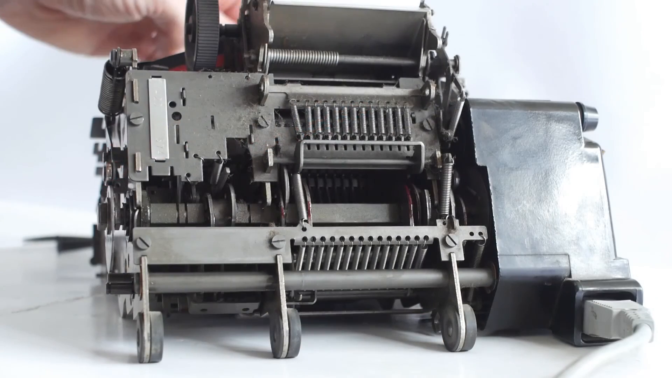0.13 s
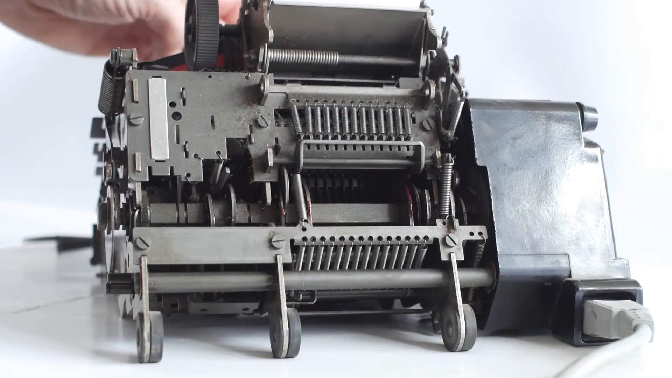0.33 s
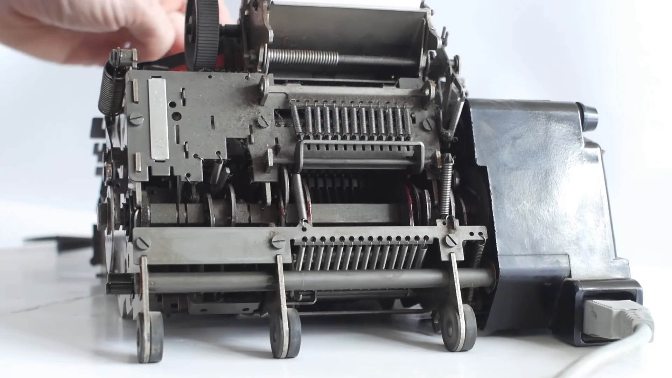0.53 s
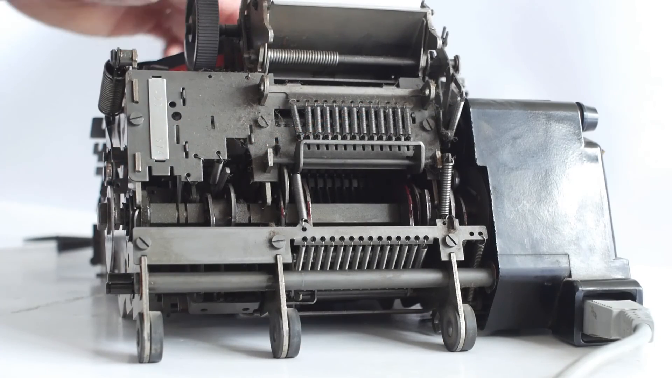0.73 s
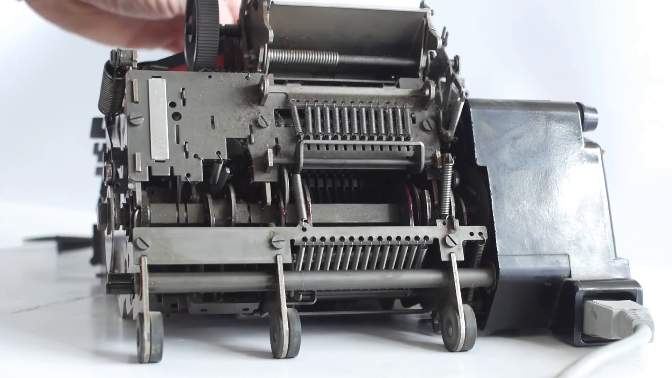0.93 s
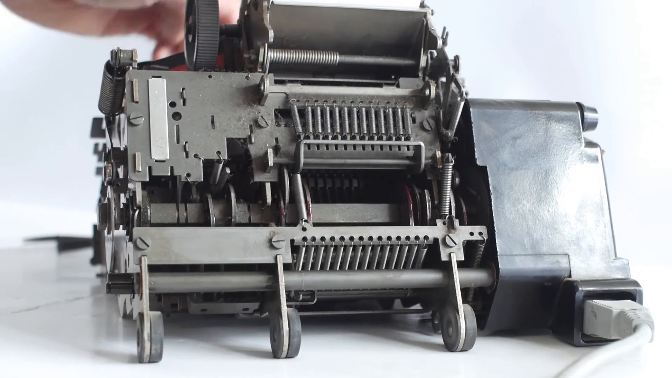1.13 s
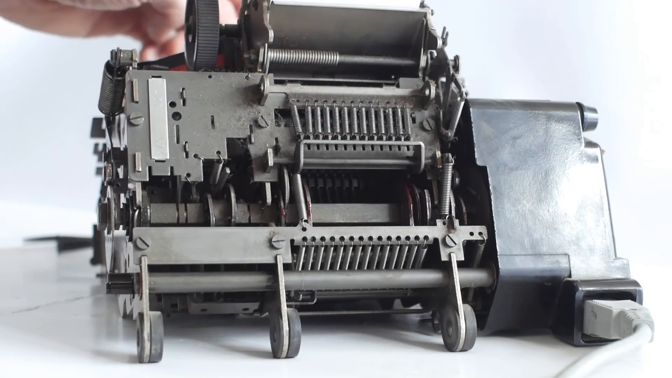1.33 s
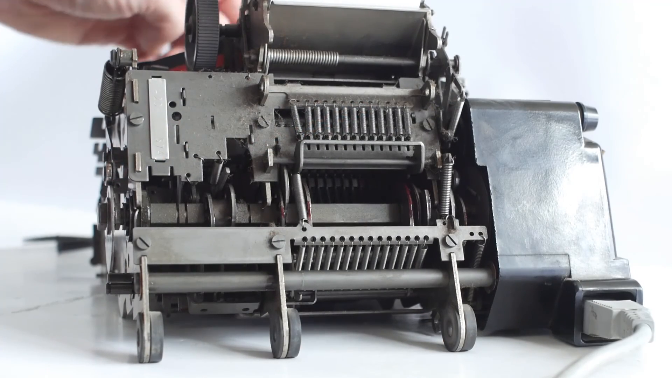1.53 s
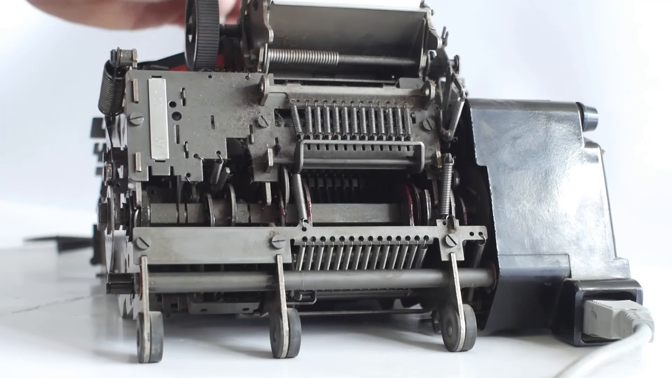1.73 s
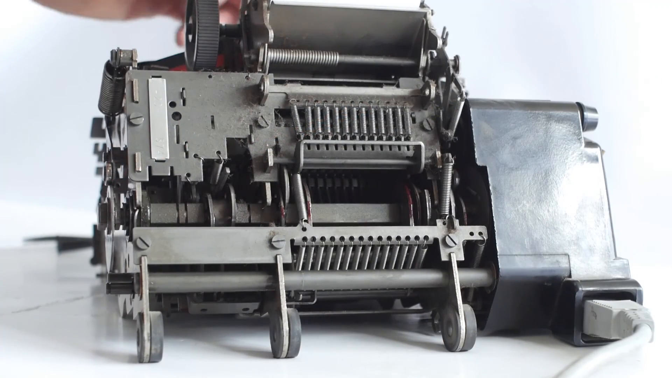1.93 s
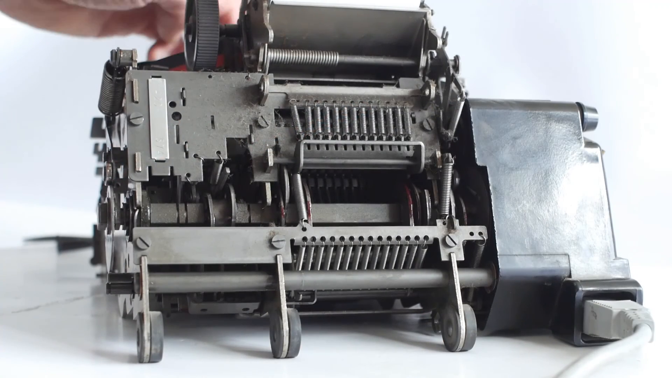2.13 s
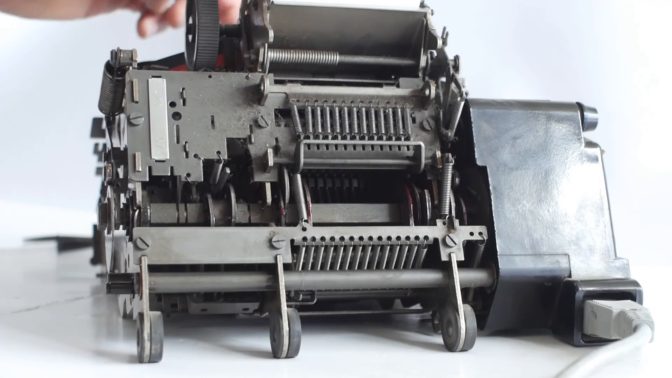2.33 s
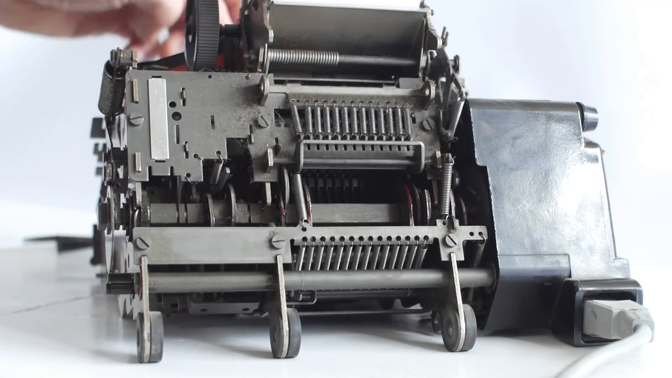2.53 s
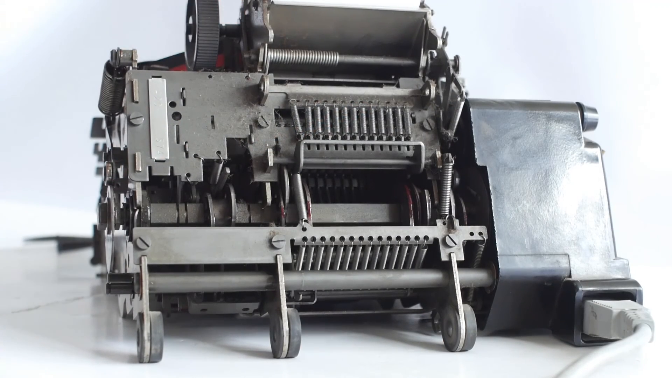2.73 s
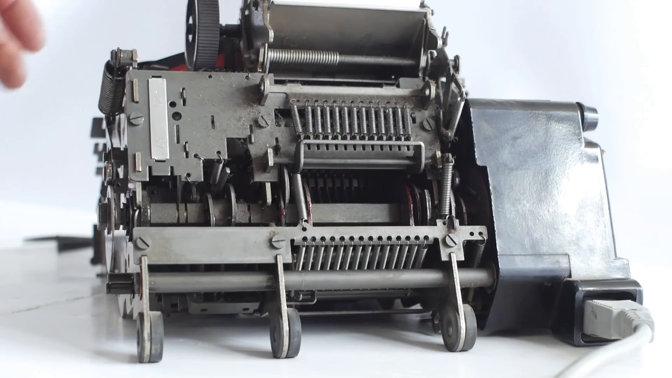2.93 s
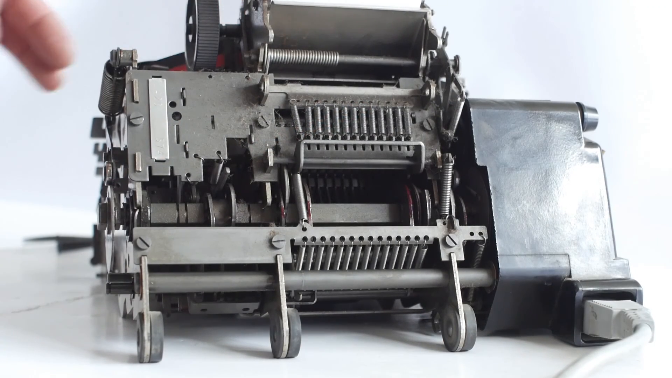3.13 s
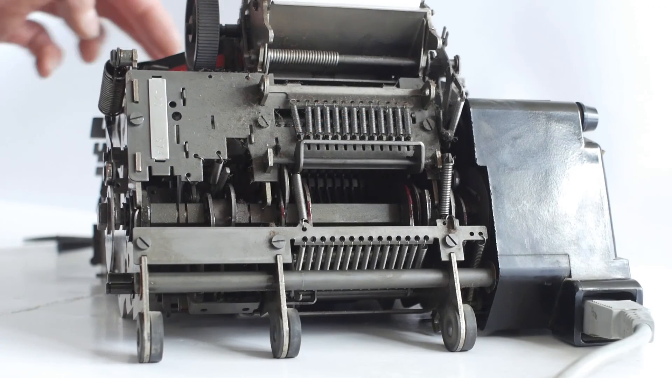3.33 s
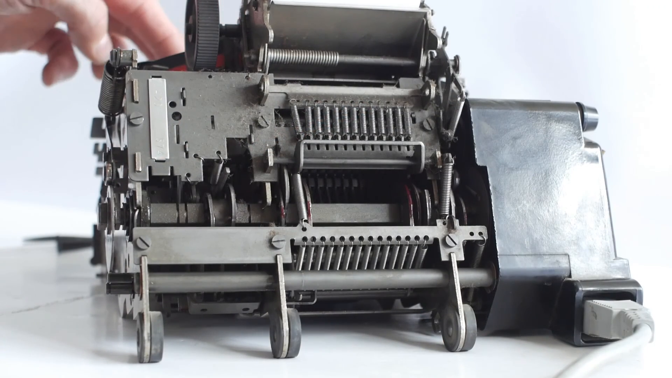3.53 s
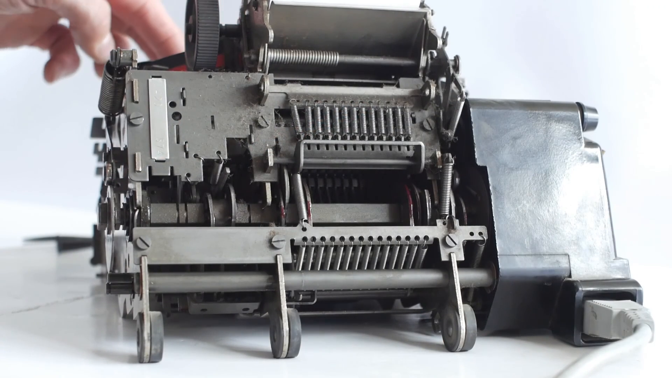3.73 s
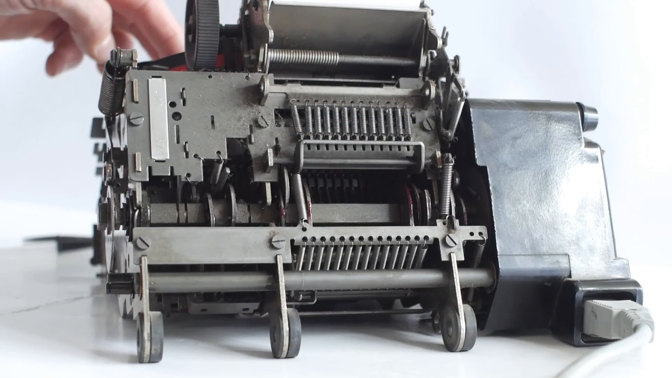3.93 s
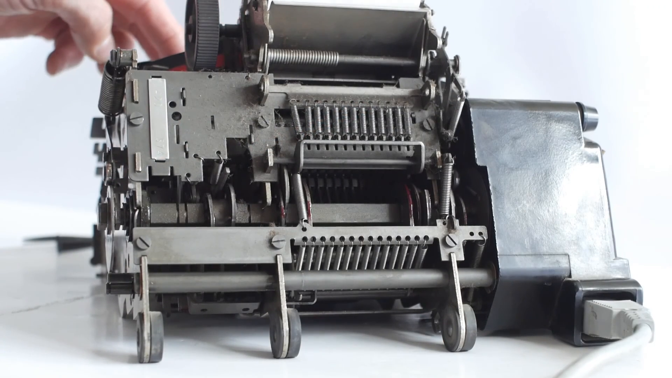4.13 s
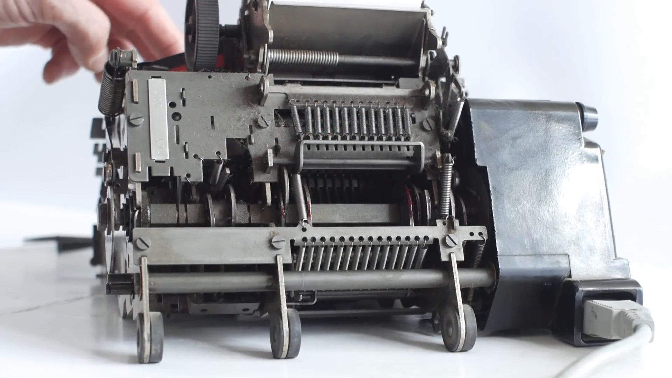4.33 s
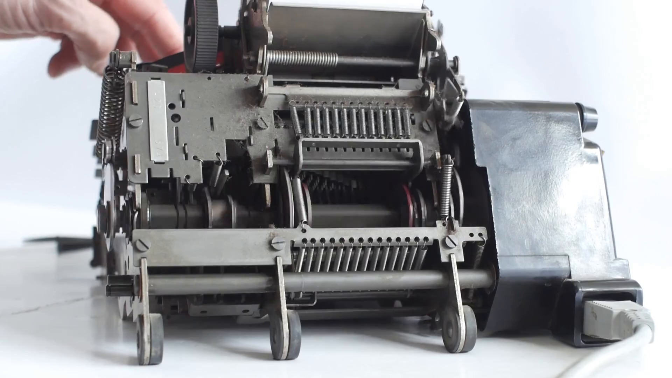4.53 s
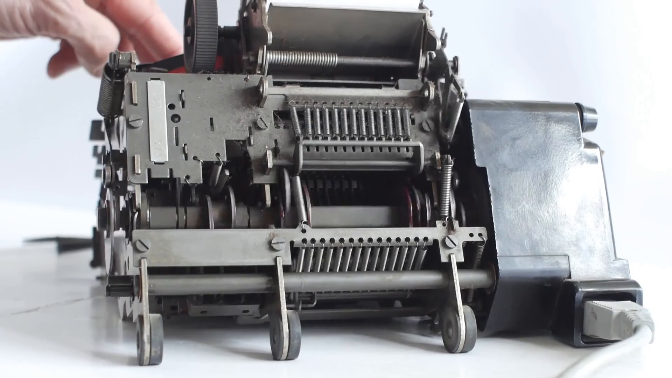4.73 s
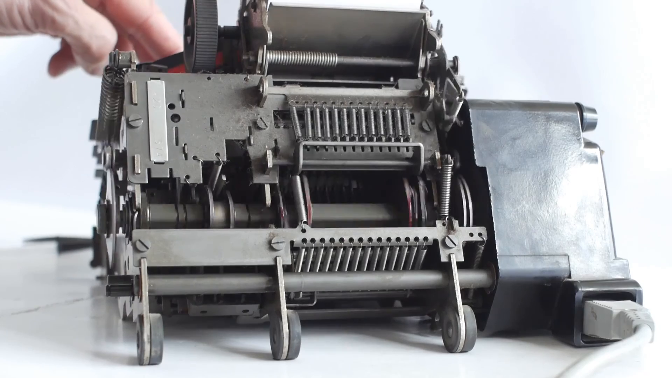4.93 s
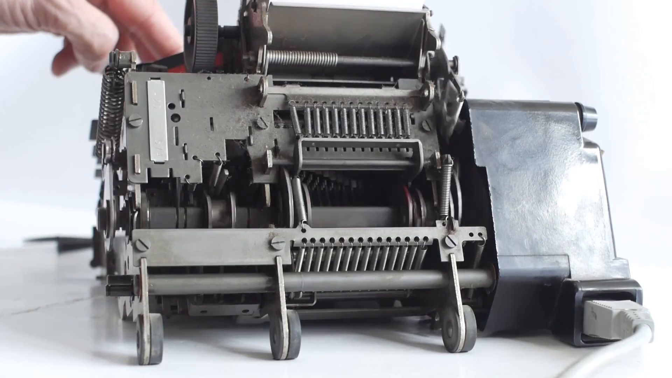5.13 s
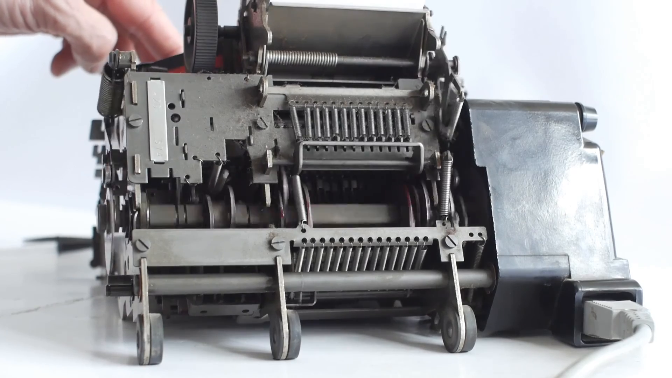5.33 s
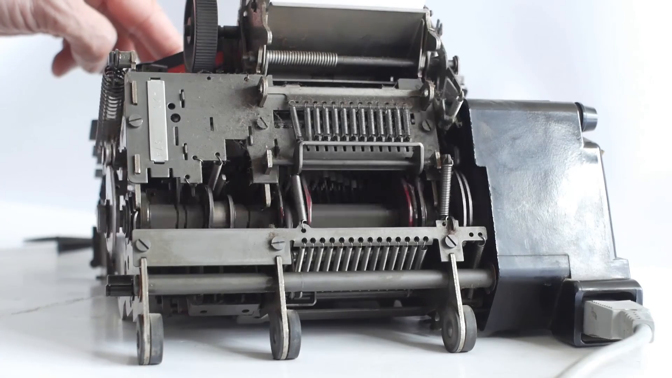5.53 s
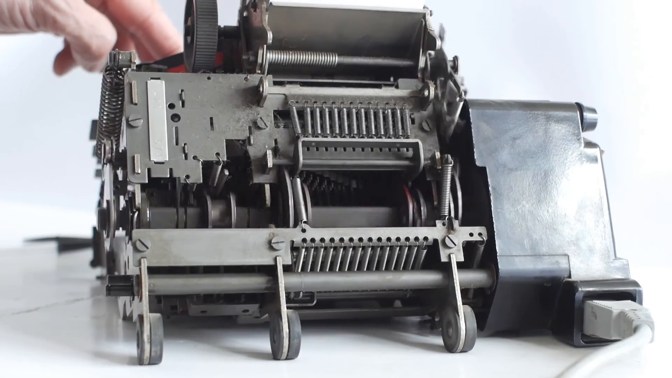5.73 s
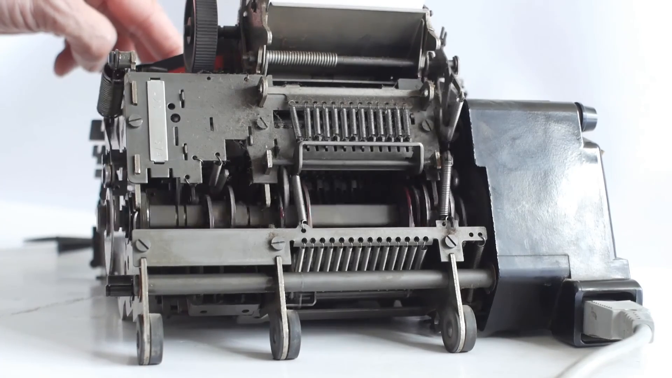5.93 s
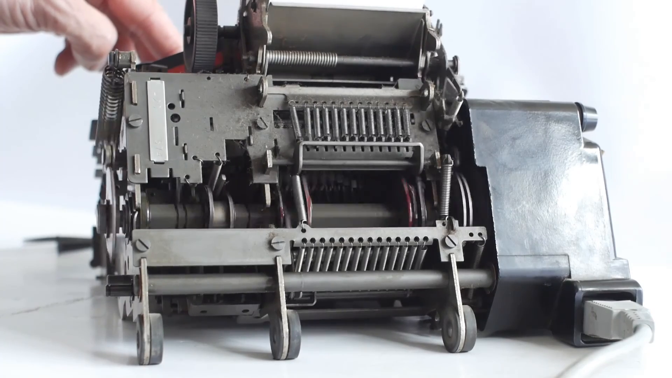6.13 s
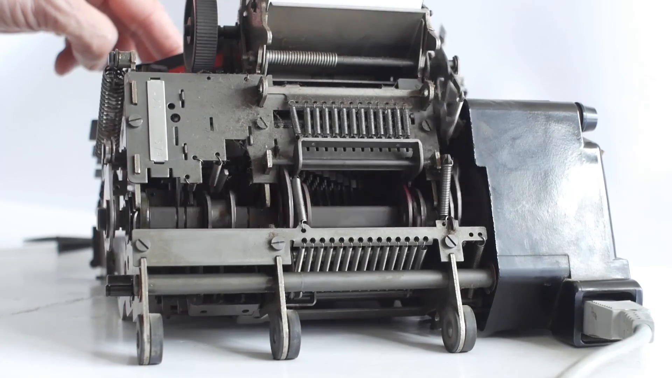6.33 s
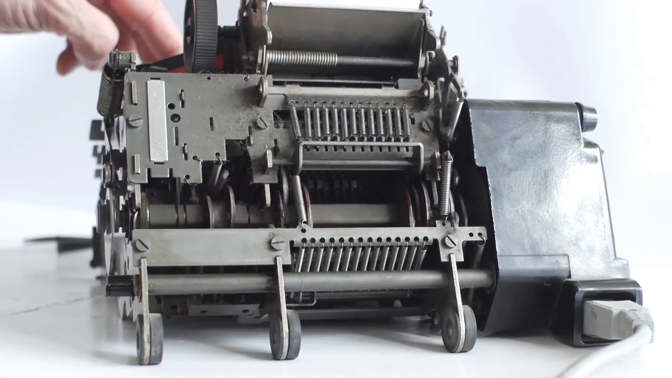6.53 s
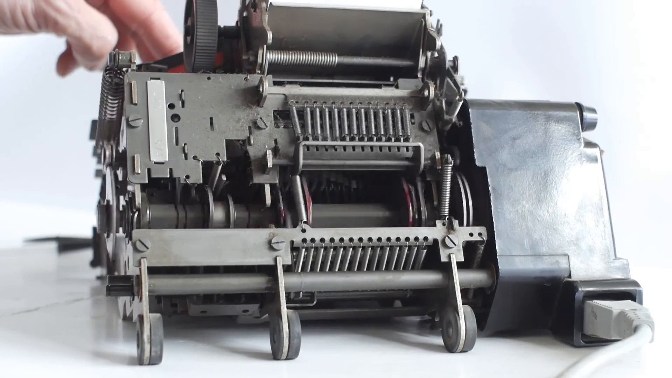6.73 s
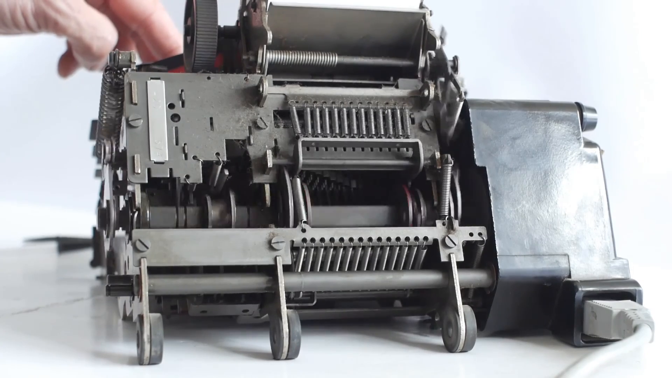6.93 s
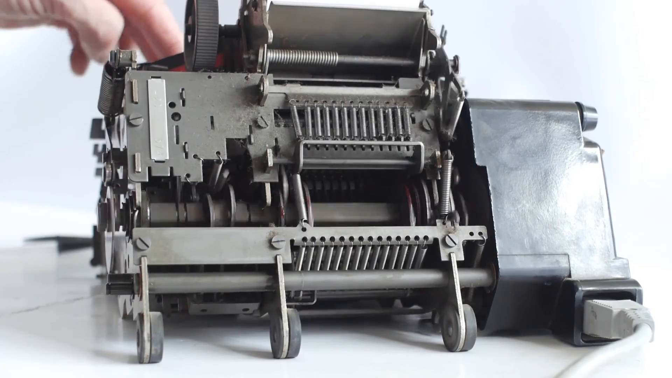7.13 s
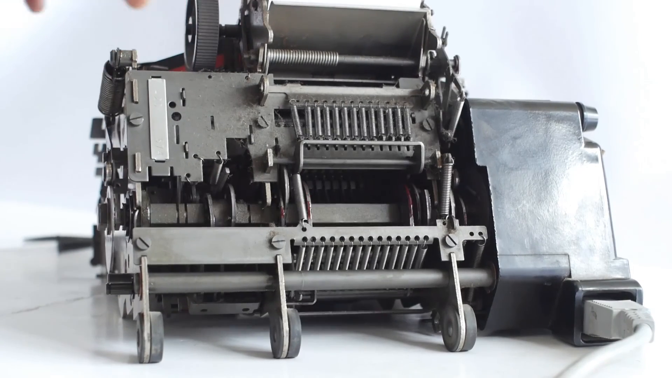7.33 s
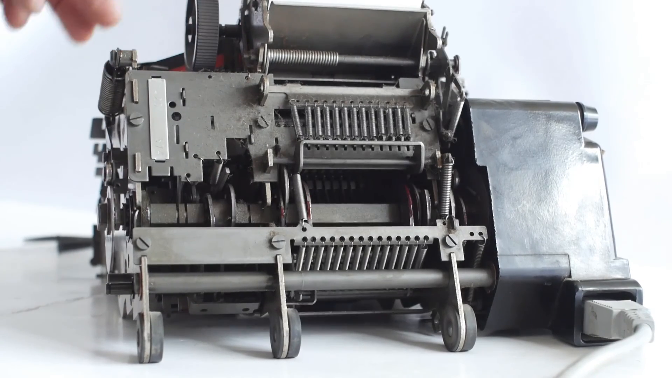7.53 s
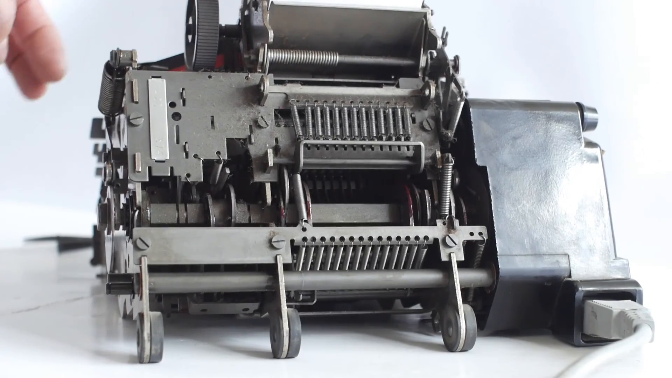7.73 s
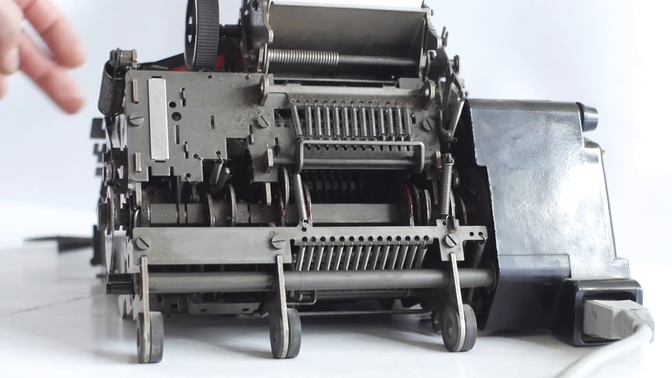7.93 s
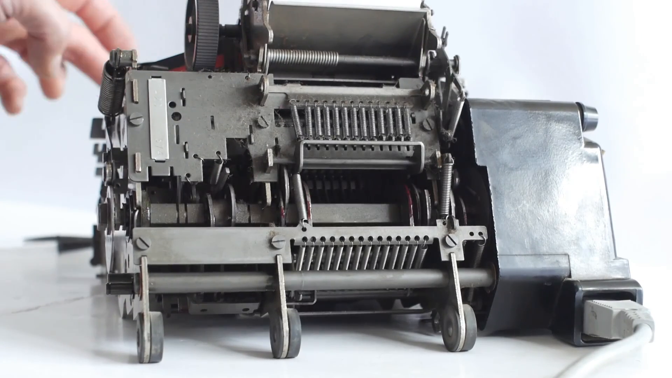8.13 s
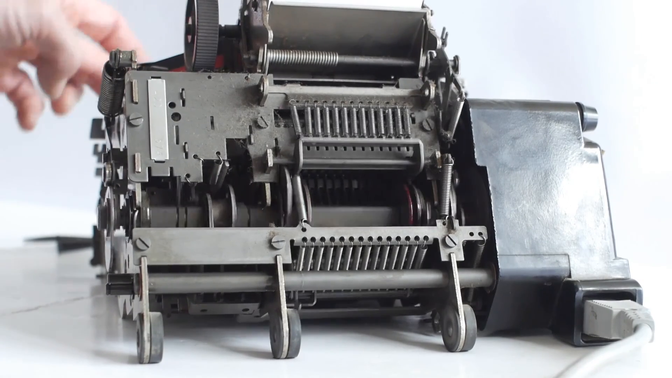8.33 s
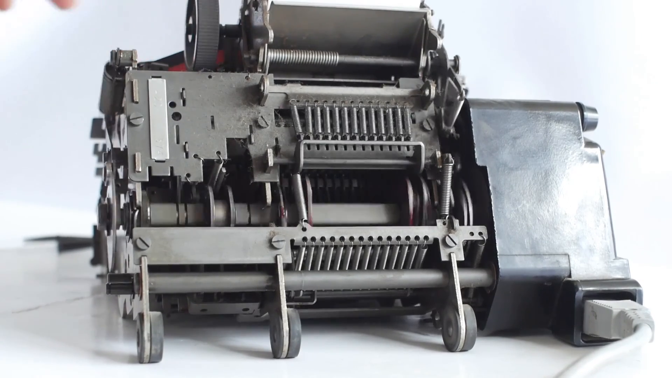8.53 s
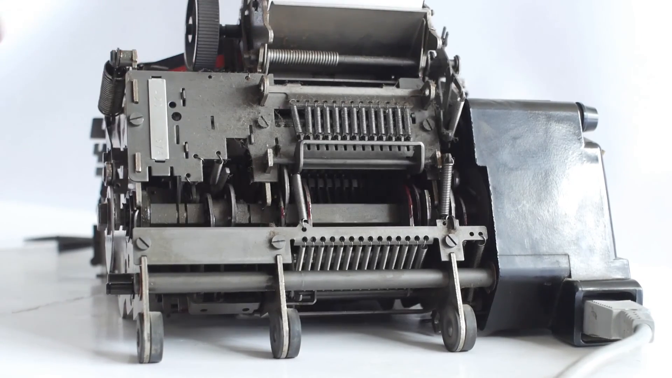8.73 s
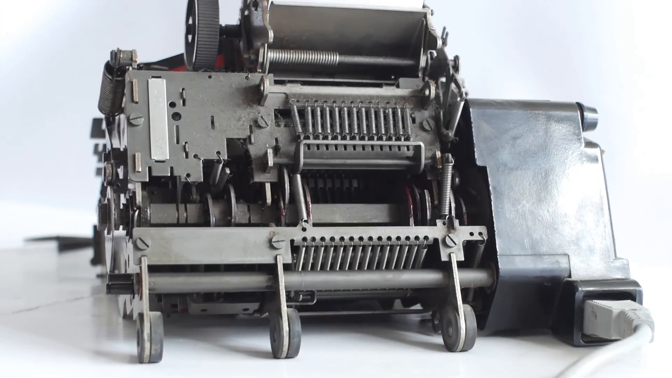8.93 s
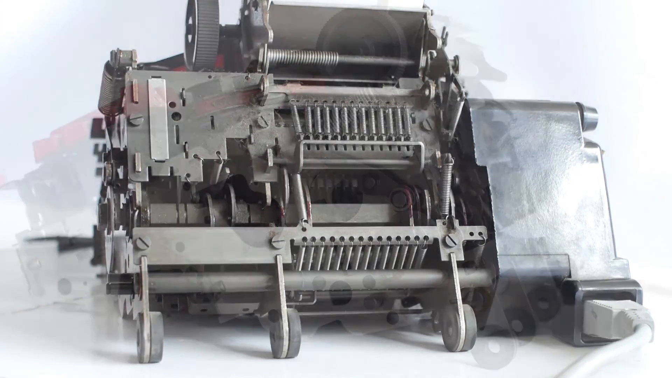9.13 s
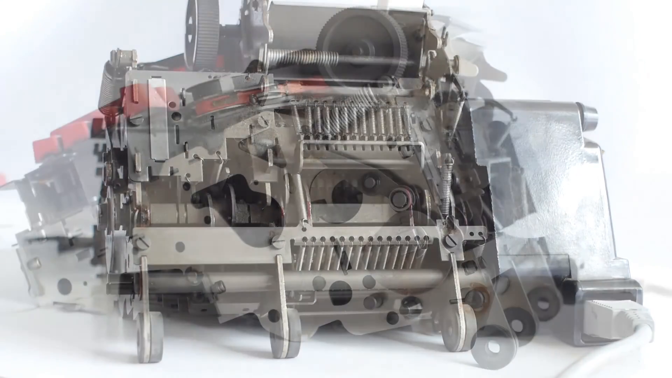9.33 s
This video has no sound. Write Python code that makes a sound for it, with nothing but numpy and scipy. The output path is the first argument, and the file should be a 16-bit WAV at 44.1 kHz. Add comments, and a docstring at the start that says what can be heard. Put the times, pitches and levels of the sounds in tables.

```python
"""The clack of a key already down is dying away in a quiet room; it snaps back and eight more follow.
An open motor-driven calculating machine on a desk: a finger fumbles at a lever, then the motor makes
nine turns of racks, pawls and cams, rests, and makes one more.
Blows are noise bursts through small-parts, frame and desk filters; the motor is coloured clicks and
noise; a bar rings in sines. Reflections, a room tail, hiss and a bass-shy microphone complete it."""
import sys
import numpy as np
from scipy import signal
from scipy.io import wavfile
from scipy.ndimage import uniform_filter1d

SR = 44100
rng = np.random.default_rng(int(sys.argv[2]) if len(sys.argv) > 2 else 0)


def master(y):
    """Save y as 16-bit WAV."""
    cut = np.clip(np.atleast_2d(y).T, -1, 1)
    pcm = np.round(cut * 32767)  # scale
    wavfile.write(sys.argv[1], SR, pcm.astype(np.int16))


N = 414099
LEAD = SR // 10  # samples computed before the start


def amp(db):
    """Decibels to gain."""
    return 10 ** (np.asarray(db) / 20)


def evened(x):
    """Scales to rms 1."""
    return x / np.sqrt(np.mean(x ** 2) + 1e-20)


def curve(rows, order=1):
    """Interpolates one column of a time table at every sample."""
    rows = np.array(rows)
    t_s = (np.arange(N + LEAD) - LEAD) / SR
    return np.interp(t_s, rows[:, 0], rows[:, order])


def read(points, hz):
    """Interpolates a spectrum over log frequency."""
    f, value = np.transpose(points)
    return np.interp(np.log(hz + 1), np.log(f), value)


def colour(x, points):
    """Causal minimum-phase filter with the given spectrum; white noise keeps its power."""
    log_gain = read(points, np.abs(np.fft.fftfreq(4096, 1 / SR))) * np.log(10) / 20
    spectrum = np.exp(np.conj(signal.hilbert(log_gain)))
    taps = np.fft.ifft(spectrum).real[:2048]
    return signal.oaconvolve(x, taps / np.linalg.norm(taps))[:len(x)]


def ring(x, modes):
    """Passes x through decaying modes (wider = faster decay); white noise keeps its power."""
    t = np.arange(4096) / SR
    taps = np.zeros(4096)
    for hz, width_hz, db in modes:
        decay = np.exp(-np.pi * width_hz * t)
        taps += amp(db) * np.sqrt(width_hz) * decay * np.sin(2 * np.pi * hz * t)
    return signal.oaconvolve(x, taps / np.linalg.norm(taps))[:len(x)]


# hiss colour: (f/Hz, relative level/dB per Hz)
HISS_COLOUR = [(15, -59), (25, -43), (236, -24), (410, -13), (531, -2), (1400, -17.5), (2480, -19),
               (3620, -24), (14400, -33), (16000, -51)]
# humming bands: (f/Hz, width/Hz, relative level/dB)
HUM_BANDS = [(165, 20, -21), (235, 30, -8.5), (538, 60, -1.5), (781, 92, -5), (1002, 60, -4.5),
             (1750, 44, -12), (2520, 260, -8)]
# room tone: (t/s, level/dB)
ROOM_TONE_DB = [(0, -55), (2.5, -55.5), (3.5, -53), (4.3, -54.5), (7.3, -62), (7.8, -65), (8.3, -62),
                (8.9, -62), (9.39, -59)]


def room_tone(same=0.39, flutter_db=2.5):
    """Distant hiss with fluttering humming bands; it sinks during the nine turns and later creeps up."""
    shared, left, right, slow = rng.standard_normal((4, N + LEAD))
    flutter = amp(flutter_db * evened(uniform_filter1d(slow, size=1200)))
    sides = []
    for own in (left, right):
        noise = same * shared + np.sqrt(1 - min(same, 1) ** 2) * own
        hum = .6 * flutter * ring(noise, HUM_BANDS)
        sides.append(evened(colour(noise, HISS_COLOUR) + hum))
    return np.array(sides) * amp(curve(ROOM_TONE_DB))


# decay of casing and room: (f/Hz, t60/s)
ROOM_T60 = [(150, .38), (400, .4), (1040, .36), (2760, 0.3), (7280, 0.31), (14000, 0.24)]
# faint long after-ring: (f/Hz, relative level/dB)
AFTER_RING = [(150, -30.5), (3000, -33), (7000, -38), (9500, -28), (14000, -27.5)]


def tail(same=.12, after_t60_s=1.3):
    """Sparse taps of random sign, each band dying at its own speed, partly shared by both sides."""
    taps = np.zeros((2, SR * 3 // 4))
    at = np.arange(130, taps.shape[1] - 20, 16)
    at = at + rng.integers(0, 16, (2, len(at)))
    np.put_along_axis(taps, at, rng.choice([-1., 1.], at.shape), axis=1)
    hz, t, z = signal.stft(taps + same * taps.sum(0), SR, nperseg=256)
    early = amp(-60 * t / read(ROOM_T60, hz)[:, None])
    late = amp(read(AFTER_RING, hz)[:, None] - 60 * t / after_t60_s)
    out = signal.istft(z * (early + late), SR, nperseg=256)[1]
    return out / np.linalg.norm(out[0])


def room(x, count=4, swaps_per_s=9):
    """Four tails take turns, nine swaps a second, crossfaded at equal power, so successive blows meet different
    tails."""
    turn = np.arange(len(x)) / SR * swaps_per_s
    wet = 0
    for k in range(count):
        distance = (turn - k + count / 2) % count - count / 2
        window = np.maximum(np.cos(np.pi * distance.clip(-1, 1) / 2), 0)
        wet = wet + signal.fftconvolve((window * x)[None], tail(), axes=1)[:, :len(x)]
    return wet


# free steel bar set ringing: (t/s, level/dB, extra level/dB per kHz)
BAR_STRIKES = [(.26, -53, 1), (2.652, -45.5, -1.5), (3.581, -52.5, 0.), (3.632, -52.5, 0)]
# its modes: (f/Hz, relative level/dB, t60/s)
BAR_MODES = [(3035, -14, 2.0), (4525, -11, 1.6), (4570, -6, 1.5), (6342, -2, .5), (8317, -6, .5),
             (10600, -6, .6)]


def bar():
    """Long thin partials of a free steel bar, as decaying sines; the tilt sets each blow's brightness."""
    out, t = np.zeros(N + LEAD + SR), np.arange(SR) / SR
    phases = rng.random((len(BAR_STRIKES), len(BAR_MODES)))
    for (s, db, tilt_db), turn in zip(BAR_STRIKES, phases):
        at = LEAD + round(s * SR)
        for (hz, mode_db, t60), phase in zip(BAR_MODES, turn):
            decay = amp(db + mode_db + tilt_db * hz / 1000 - 60 * t / t60)
            out[at:at + SR] += decay * np.sin(2 * np.pi * (hz * t + phase))
    return out[:N + LEAD]


# shaft turns: t/s and relative level/dB in pairs for latch, clank, release, rack stop, trip;
# then pawl tick lift/dB, rack tick lift/dB
SHAFT_TURNS = [(4.5563, -17, 4.6434, -20, 4.6819, -18, 4.732, -16, 4.813, -19, 2.5, -1),
               (4.8575, -25, 4.9475, -18, 4.982, -18.5, 5.0305, -19, 5.119, -20, 1.5, -3),
               (5.1712, -20, 5.2593, -21.5, 5.294, -18, 5.3441, -18.5, 5.4298, -16.5, 3, 2),
               (5.4766, -21.5, 5.5659, -21.5, 5.5994, -19, 5.6475, -19.5, 5.7308, -19, 1.5, 2),
               (5.777, -22, 5.8573, -20, 5.8866, -18.5, 5.9343, -18, 6.023, -18.5, .4, -2),
               (6.0694, -26.5, 6.1597, -21, 6.1937, -20.5, 6.2427, -18.5, 6.3304, -18.6, -1.5, .4),
               (6.3764, -25.6, 6.464, -21.5, 6.4988, -21, 6.547, -21, 6.6302, -19.5, -3, .4),
               (6.6761, -23.5, 6.7612, -28, 6.794, -19, 6.8437, -18, 6.933, -20, -3.5, -2),
               (6.9814, -23, 7.066, -25, 7.098, -18.5, 7.154, -21.5, 7.2327, -21, -2, -3),
               (8.4386, -18.5, 8.5314, -22, 8.563, -19, 8.6116, -14.5, 8.6889, -26, -5, -7)]
# places of those five blows: (share of a turn)
BLOW_SHARES = [-.29, 0, .115, .28, .56]


def shaft():
    """Times/s and shaft angles/turns of the cam blows."""
    times_s = np.array(SHAFT_TURNS)[:, :10:2].ravel()
    turns = (np.arange(len(SHAFT_TURNS))[:, None] + BLOW_SHARES).ravel()
    return times_s, turns


# one shaft turn: (share of the turn, gear rattle/dB, desk drone/dB), before load
TURN_LEVELS = [(0, -34, -42), (.1, -35, -51.5), (.13, -25, -53), (.25, -31, -53), (.31, -28, -43),
               (.38, -45, -46), (.5, -38, -55), (.56, -37.5, -50), (.67, -45, -54), (.73, -33, -52),
               (.82, -32.5, -45), (.95, -35, -49.5), (1, -30, -42.5)]
# finger sliding along the casing: (t/s, level/dB)
FINGER_SLIDE = [(2.8, -120), (2.85, -62), (2.94, -48.5), (2.97, -56), (3.04, -66), (3.08, -120),
                (3.8, -120), (3.84, -68), (3.89, -62), (3.95, -68), (4.0, -120)]
# colours: (f/Hz, relative level/dB per Hz)
RATTLE_COLOUR = [(590, -43), (1000, -17), (1730, -3), (2990, -6.5), (7960, -2.5), (9820, 4), (14600, -13),
                 (15600, -31.5), (16200, -68)]
DRONE_COLOUR = [(35, -44), (60, -14), (221, -2), (398, -7.5), (934, -1), (1200, -7), (1560, -35.5),
                (2640, -120)]
# motor at full level: (start t/s, stop t/s)
MOTOR_RUNS = [(4.53, 7.235), (8.39, 8.72)]
RAMP_S, LOAD_DB, EASE_DB_PER_TURN = .03, 2.1, .4  # ramps lie just outside each run


def motor(clicks_per_s=6000, spread_db=1.5):
    """Gear teeth chatter as dense uneven clicks and the desk drones; a finger slide shares the clicks."""
    n = N + LEAD
    uneven = amp(spread_db * np.minimum(rng.exponential(1, n), 4))
    teeth = rng.standard_normal(n) * uneven * (rng.random(n) < clicks_per_s / SR)
    share, rattle_db, drone_db = np.transpose(TURN_LEVELS)
    t = (np.arange(n) - LEAD) / SR
    turns = curve(np.transpose(shaft()))
    gates = [np.clip(np.minimum(t - start, stop - t) / RAMP_S, -1, 0) for start, stop in MOTOR_RUNS]
    gate_db = 120 * np.max(gates, axis=0)  # 0 dB in a run, -120 dB outside
    load_db = LOAD_DB - EASE_DB_PER_TURN * turns + gate_db
    rattle = amp(np.interp(turns % 1, share, rattle_db) + load_db) + amp(curve(FINGER_SLIDE))
    drone = amp(np.interp(turns % 1, share, drone_db) + load_db)
    clatter = rattle * evened(colour(teeth, RATTLE_COLOUR))
    return clatter + drone * evened(colour(rng.standard_normal(n), DRONE_COLOUR))


# lever, clutch and stray contacts: (t/s, small parts relative level/dB, frame relative level/dB, length/ms)
STRAY_CONTACTS = [(.0824, -45, -44, 2.1), (.4013, -44, -44.6, 3.0), (2.2257, -44.6, -34.6, 3.2),
                  (2.88, -49, -46, 3.8), (2.925, -60, -47, 5), (2.945, -60, -45, 5),
                  (2.9643, -62, -40.5, 4.6), (3.0226, -66, -48, 5.5), (3.5811, -37.6, -43, 3.1),
                  (3.5908, -41, -47, 2.3), (3.6315, -40.6, -48, 2.7), (3.717, -47.5, -52, 4.8),
                  (4.2605, -44.5, -53, 3.9), (4.2833, -49.5, -48, 3.3), (4.346, -50.6, -49, 4.6),
                  (4.3803, -49, -56.5, 5.8), (4.4, -40, -49, 2.9), (4.4435, -18, -31, 2.5),
                  (4.4477, -16, -26, 3.1), (4.5121, -26.6, -28.5, 3.6), (8.289, -40, -50, 3),
                  (8.2944, -27.5, -38, 3.4), (8.3003, -28, -42, 2.1), (8.3235, -24, -35.5, 3.5),
                  (8.3278, -17, -27, 2.5), (8.3312, -23, -33.5, 2.6), (8.3368, -25.5, -36.5, 2.3),
                  (8.4, -37.5, -29.5, 2.9), (8.4217, -25.6, -38.5, 3.5), (8.4304, -25, -34, 2.1),
                  (8.5048, -26, -33.5, 3.2), (8.5174, -24, -32, 2.9), (8.6683, -24.5, -34, 3),
                  (8.7018, -20.5, -33, 2.3), (8.7296, -33, -34, 5.5), (8.7506, -34.6, -40, 2.6)]
# machine rocks on its feet: (t/s, thud relative level/dB)
FOOT_BUMPS = [(2.93, -49), (4.447, -48), (8.327, -46), (8.43, -46), (8.734, -41.5)]


def stray():
    """Lever, clutch and loose parts touch; the machine rocks on its feet."""
    return STRAY_CONTACTS, FOOT_BUMPS


# keys down: (touch t/s, touch relative level/dB, stop t/s, then relative levels/dB:
# small parts, frame, rebound, desk thud)
KEY_PRESSES = [(-.075, -30, -.06, -20, -27, -28, -50), (.232, -29, .2562, -26, -23.5, -26, -54),
               (.5575, -24.5, .5701, -17.5, -25.5, -25.6, -50.5),
               (.9317, -21, .9472, -17.5, -21, -24, -48.5), (1.2357, -24, 1.2476, -17, -19, -30, -52),
               (1.523, -25, 1.533, -15, -22, -29.5, -48), (1.8375, -24, 1.8567, -17.5, -26, -28, -52),
               (2.1248, -22.5, 2.1355, -18, -22, -30, -52), (2.5217, -20, 2.5288, -17, -20.5, -30, -54)]
# keys springing back: same columns, unlatch in place of touch
KEY_RETURNS = [(.125, -42, .1384, -21.6, -27, -32, -39.5), (.4303, -30.6, .4466, -24, -24, -32.5, -41),
               (.722, -28.5, .7374, -22.5, -27.5, -38, -38), (1.0814, -30, 1.0962, -22.5, -26, -26, -39),
               (1.3716, -30, 1.3859, -21, -27.5, -38, -37.5), (1.6555, -28, 1.6732, -23.5, -27, -38, -38.5),
               (1.97, -26, 1.987, -24, -27.5, -36, -36.5), (2.2504, -26, 2.2664, -22.5, -26.5, -38, -35),
               (2.6331, -21, 2.651, -27, -32, -33.6, -39.5)]
# stroke shapes: (contact/ms, frame knock delay/ms, relative knock level/dB, stop/ms, rebound delay/ms)
PRESS_SHAPE = (4.2, 2.5, -8, 3.0, 7.5)
RETURN_SHAPE = (3.0, 3.5, -1.5, 3.6, 15.5)


def stroke(rows, shape):
    """A key touches or unlatches, knocks the frame, hits its stop, rebounds, and thuds the desk."""
    first_ms, knock_ms, knock_db, stop_ms, rebound_ms = shape
    blows = []
    for first, first_db, s, parts_db, frame_db, rebound_db, _ in rows:
        blows += [(first, first_db, -120, first_ms),
                  (first + knock_ms / 1000, -120, first_db + knock_db, first_ms),
                  (s, parts_db, frame_db, stop_ms),
                  (s + rebound_ms / 1000, rebound_db, rebound_db - 7, 2.5)]
    thuds = [(row[2] - .004, row[-1]) for row in rows]
    return blows, thuds


# the five cam blows: (frame over small parts/dB, length/ms)
CAM_BLOWS = [(-10, 4.0), (5.5, 2.6), (-9, 5.2), (-13, 3.2), (-6, 3.8)]
# pawl and rack ticks: (share of the turn, small parts/dB, frame/dB, length/ms), levels before lift and scatter
TURN_TICKS = [(-.19, -25.5, -33, 4), (-.133, -25, -33, 3.8), (-.087, -25, -32, 2.6), (.037, -34, -32, 2.4),
              (.174, -25.5, -35, 3), (.212, -25.5, -35, 3), (.234, -24.5, -36, 3), (.315, -24, -33, 3),
              (.536, -24.5, -33, 2.9)]
TICK_SCATTER_DB, TICK_SCATTER_MS, CLANK_THUD_DB = 1.5, 1.1, -41.5  # thud before load


def cycle():
    """Five cam blows a turn, with lighter, looser pawl and rack ticks between; the clank thuds the desk."""
    count, table = len(SHAFT_TURNS), np.array(SHAFT_TURNS)
    s, turns = shaft()
    over_db, ms = np.tile(CAM_BLOWS, (count, 1)).T
    db = table[:, 1:10:2].ravel()
    share, parts_db, frame_db, tick_ms = np.tile(TURN_TICKS, (count, 1)).T
    turn = np.repeat(np.arange(count), len(TURN_TICKS))
    late, loud = rng.standard_normal((len(turn), 2)).T
    lift_column = np.where(share < 0, -2, -1)  # pawl, rack
    lift_db = table[turn, lift_column] + TICK_SCATTER_DB * loud
    tick_s = np.interp(turn + share, turns, s) + late * TICK_SCATTER_MS / 1000
    ticks = zip(tick_s, parts_db + lift_db, frame_db + lift_db, tick_ms)
    clank_db = CLANK_THUD_DB + LOAD_DB
    thuds = [(row[2], clank_db - EASE_DB_PER_TURN * k) for k, row in enumerate(SHAFT_TURNS)]
    return list(zip(s, db, db + over_db, ms)) + list(ticks), thuds


def bursts(times, levels_db, lengths_ms, rise=0.38, fall=0.63, scrape=0.24, scrape_ms=2.5,
           chatter=.3, chatter_ms=7.7):
    """Each blow is a flurry of tiny contacts: the part scrapes in, strikes, then chatters to rest."""
    size, lead_in = 3000, 400  # samples
    out = np.zeros(N + LEAD + size)
    ms_axis = (np.arange(size) - lead_in) * 1000 / SR
    before, after = np.minimum(ms_axis, 0), np.maximum(ms_axis, 0)
    scrape_in = scrape * np.exp(-(before / scrape_ms) ** 2)
    skirt = np.where(ms_axis < 0, scrape_in, chatter * np.exp(-after / chatter_ms))
    noise = rng.standard_normal((len(times), size))
    for s, db, ms, contacts in zip(times, levels_db, lengths_ms, noise):
        u = after / max(ms, 1)
        attack = np.sin(np.pi / 2 * np.minimum(u / rise, 1)) ** 2
        shape = np.maximum(skirt, attack * np.exp(-np.maximum(u - rise, 0) / fall))
        flurry = shape * contacts
        at = LEAD + round(s * SR) - lead_in
        # equal energy whatever the draw
        out[at:at + size] += amp(db) * flurry * np.linalg.norm(shape) / np.linalg.norm(flurry)
    return out[:N + LEAD]


# small steel parts: (f/Hz, relative level/dB per Hz)
SMALL_PARTS = [(2350, -34.5), (4000, -7.5), (4880, -7.5), (7980, -6), (8810, -1.5), (10400, -3),
               (14600, -24.5), (15600, -24.5), (16200, -45)]
# thin plates radiate little bass: (f/Hz, relative level/dB)
PLATE_COLOUR = [(700, -14), (1200, -6), (1700, 0.5)]
# frame plates, then desk top: (f/Hz, width/Hz, relative level/dB)
FRAME_MODES = [(1400, 200, -17), (1710, 220, -1), (2135, 200, 7.5), (2565, 520, 10.5), (3200, 530, 6.5),
               (3674, 350, 5), (4400, 680, -8)]
DESK_MODES = [(210, 60, -22), (340, 90, -6), (535, 90, 1), (836, 190, -3)]
# the deepest thud is held back: (f/Hz, relative level/dB)
THUD_BASS_CUT = [(60, -6), (300, 0)]


def strikes():
    """Blows shake the small parts and ring the frame; keys, foot bumps and cam clanks thud the desk."""
    presses, returns = stroke(KEY_PRESSES, PRESS_SHAPE), stroke(KEY_RETURNS, RETURN_SHAPE)
    blows, thuds = zip(presses, returns, stray(), cycle())
    s, parts_db, frame_db, ms = np.concatenate(blows).T
    parts = amp(1.7) * colour(bursts(s, parts_db, ms, fall=.75, chatter=.3), SMALL_PARTS)
    plates = colour(bursts(s, frame_db, ms, fall=.4), PLATE_COLOUR)
    frame = amp(2.0) * ring(plates, FRAME_MODES)
    s, thud_db = np.concatenate(thuds).T
    push = bursts(s, thud_db, np.full(len(s), 7.0), scrape=0, chatter=.5, chatter_ms=30.0)
    desk = amp(4.5) * ring(colour(push, THUD_BASS_CUT), DESK_MODES)
    return parts + frame + desk


def scene():
    """Machine slightly left, bright glancing desk reflection, bass through the desk, room and room tone."""
    machine = strikes() + motor() + bar()
    glance = np.diff(np.roll(machine, 37), prepend=0)  # 0.8 ms late, treble-heavy
    through = signal.lfilter(*signal.butter(2, 450, fs=SR), np.roll(machine, 330))  # 7.5 ms late
    side = amp(-14.0) * glance + amp(-5.5) * through
    near = machine * amp([[.4], [-.4]]) + np.array([side, -side])  # opposite signs left and right
    return (near + amp(-6.0) * room(machine) + room_tone())[:, LEAD:]


# microphone: (f/Hz, relative level/dB)
MICROPHONE_COLOUR = [(100, -10), (165, 0)]
EDGE_HZ = 16000


def record(dry):
    """The small microphone drops the bass; then a low-pass limits the band."""
    thin = np.array([colour(side, MICROPHONE_COLOUR) for side in dry])
    low_pass = signal.firwin(511, EDGE_HZ, window=("kaiser", 9), fs=SR)
    return signal.oaconvolve(thin, low_pass[None], "same")


dry = scene()
out = record(dry)
master(out)
```